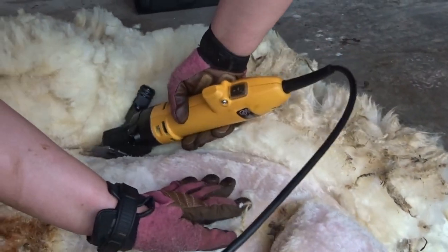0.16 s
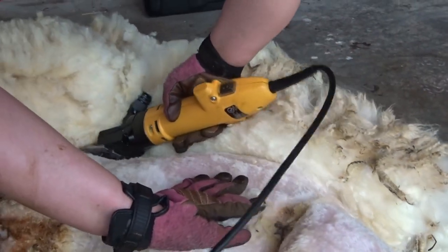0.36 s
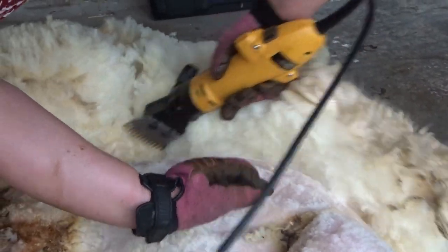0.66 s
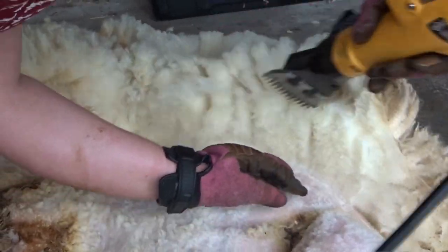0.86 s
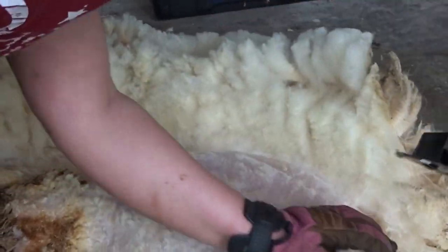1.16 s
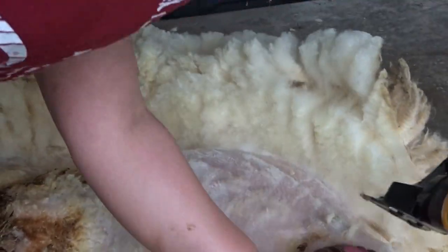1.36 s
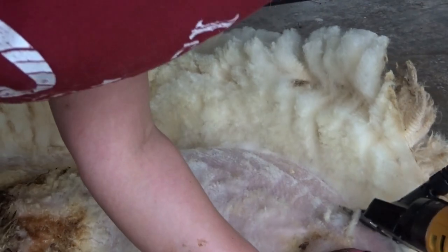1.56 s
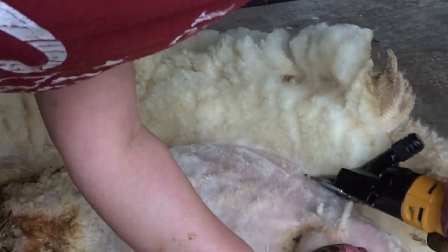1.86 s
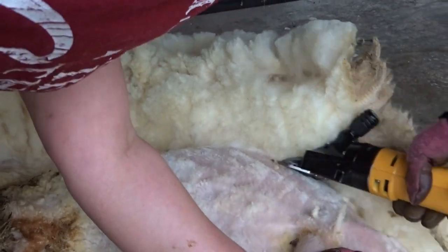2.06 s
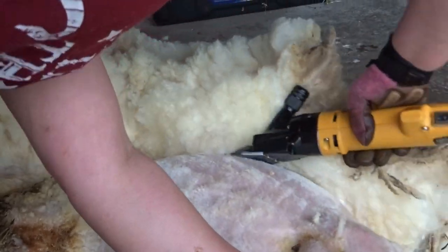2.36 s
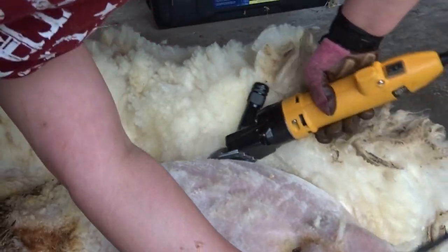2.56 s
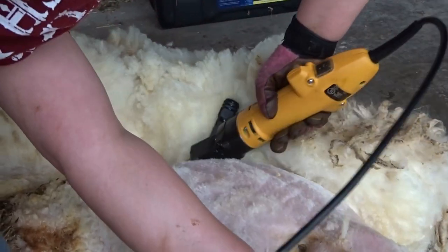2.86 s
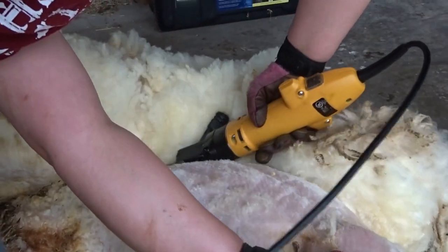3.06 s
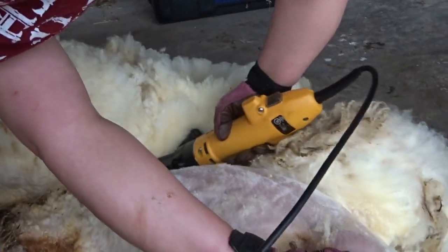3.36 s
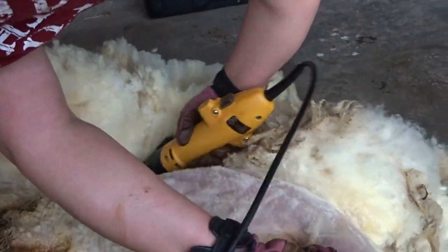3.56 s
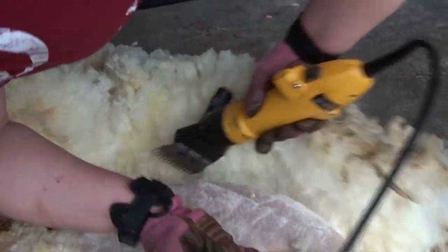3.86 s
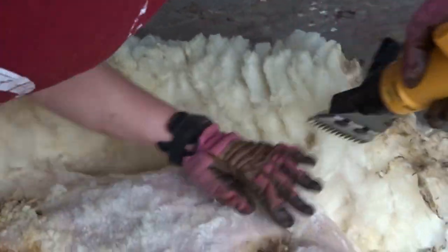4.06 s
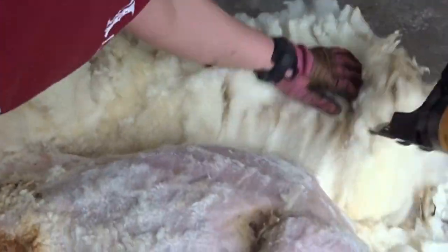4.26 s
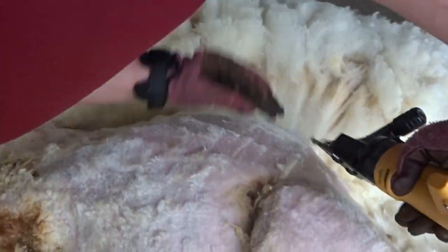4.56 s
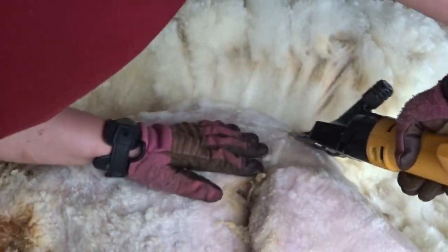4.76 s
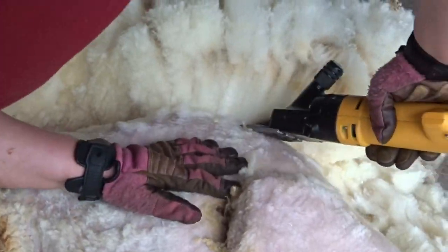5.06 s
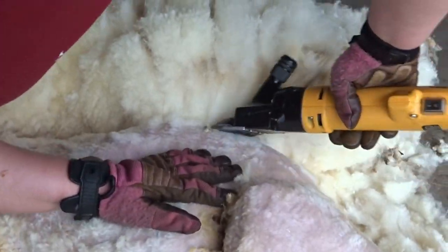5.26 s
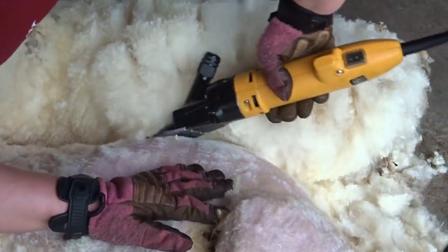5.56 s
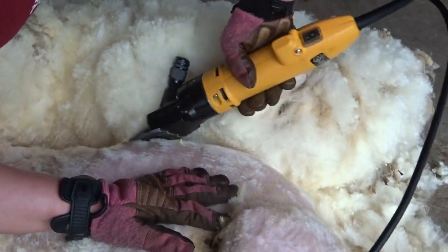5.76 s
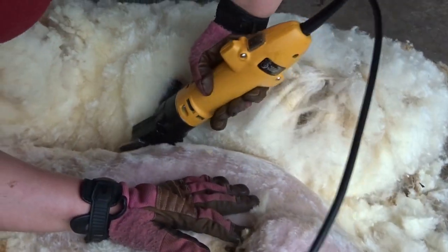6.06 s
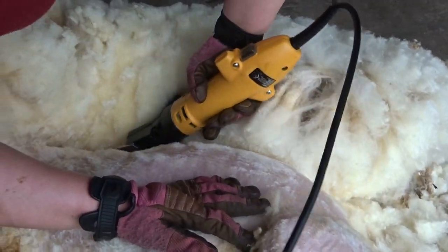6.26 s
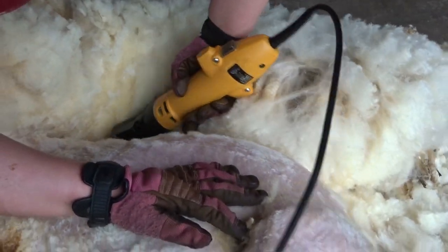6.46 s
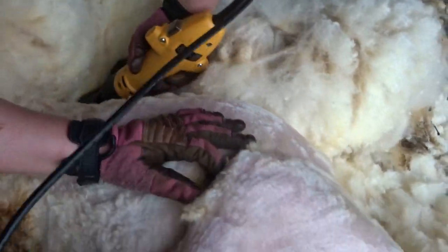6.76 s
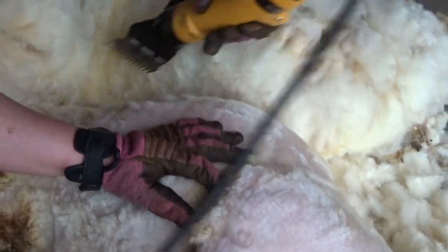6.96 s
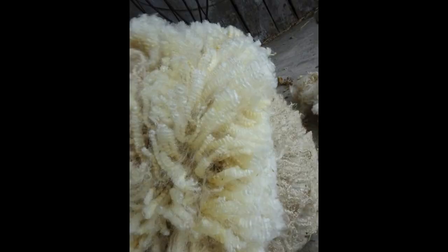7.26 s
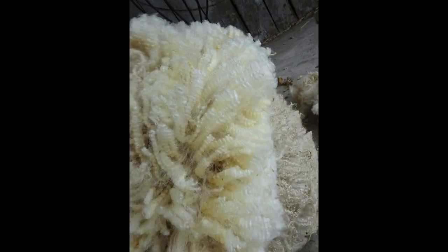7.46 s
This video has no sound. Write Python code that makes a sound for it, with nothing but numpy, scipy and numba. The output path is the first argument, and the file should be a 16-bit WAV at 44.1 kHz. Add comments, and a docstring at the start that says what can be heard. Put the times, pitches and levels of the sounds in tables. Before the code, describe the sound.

A hand-held shearing machine works through a fleece, close-miked, with faint barn reverberation. Steady hum, metallic grinding and fast blade chatter blend with a broad dry hiss and fine crackle. The high whine is slightly rough, rising when the tool is free and falling during long pushes, once quickly and then sliding lower, once more gradually and deeper. The hiss flares a little between pushes. The sound ends abruptly in silence.

```python
"""In a barn, electric sheep shears work close to a two-port microphone. At first a long push is under way;
it ends at 0.5 s and the motor picks up. Two more pushes, from 1.8 and 5 s, each slow it; at 7.2 s all is cut off.
A sine at the rotor's rate makes the hum, and a fluttering tone and weaker sines make the whine of the gears.
Clicks at each end of the cutter's stroke ring housing and comb; shaped noise grinds and rasps, and tiny clicks
crackle as wool fibres part. Dull echoes of the barn and a faint rumble lie behind."""
import sys
import numpy as np
from scipy import signal
from scipy.fft import rfft, irfft, next_fast_len
from scipy.io import wavfile
from scipy.ndimage import map_coordinates
from numba import njit

SR = 44100
rng = np.random.default_rng(int(sys.argv[2]) if len(sys.argv) > 2 else 0)


def log_audio(samples):
    """Write samples as a 16-bit WAV file to the path given in sys.argv[1]."""
    # one column per channel
    frames = np.atleast_2d(samples).T
    # limit to full scale, then quantise
    limited = np.clip(frames, -1, 1)
    pcm = np.round(limited * 32767).astype(np.int16)
    wavfile.write(sys.argv[1], SR, pcm)


N = 336483
TIME = np.arange(N) / SR  # s
WHINE_ORDER, ROTOR_ORDER = 32, 4  # cycles of whine and of hum per turn of the gear wheel
STROKES_PER_TURN = .5115  # cutter strokes, to and fro, per turn of the gear wheel
MAINS_HZ = 60


# Long pushes through the fleece; the first began before the start, the last comes after the end.
# Each row: comb enters in seconds, push ends in seconds, sag of the whine as the fleece bites in Hz,
# time to bite in seconds, further sag in Hz per second, gear grind change in dB, cutter knock change in dB.
BLOWS = [(-1.08, .5, 132, .12, 12, -7, 2), (1.82, 3.63, 77, .13, 82, 0.5, 1.8),
         (5, 6.73, 238, .78, 0, 1.5, -0.5), (8.5, 9.9, 238, .78, 0, 0, 1)]
FREE_HZ, RECOVER_S = 3178, .41  # gear whine with no load; time the motor takes to pick up again


def motor_speed():
    """Fleece bites, then may slow the motor further the longer the push lasts; it then recovers. Whine in Hz."""
    hz = FREE_HZ
    for enters, ends, bite_hz, bite_s, drag_hz_per_s, *_ in BLOWS:
        cutting_s = np.clip(TIME, enters, ends) - enters
        bite_sag_hz = bite_hz * (1 - np.exp(-cutting_s / bite_s))
        sag_hz = bite_sag_hz + drag_hz_per_s * cutting_s
        recovery = np.exp(-np.maximum(TIME - ends, 0) / RECOVER_S)
        hz = hz - sag_hz * recovery
    return hz


def by_blow(column, ease_s):
    """A column of BLOWS held through each push, easing in and out."""
    total = 0
    for row in BLOWS:
        eased_in = np.tanh((TIME - row[0]) / ease_s)
        eased_out = np.tanh((TIME - row[1]) / ease_s)
        total = total + row[column] * (eased_in - eased_out) / 2
    return total


def blow_cycle():
    """Where the hand is in its round: 0 as the comb enters, 0.5 as the push ends, 1 when it is back."""
    moments = np.array(BLOWS)[:, :2].ravel()
    return np.interp(TIME, moments, np.arange(len(moments)) / 2) % 1


# Stages of every blow, by name: the push runs from 0 to 0.5, the way back from 0.5 to 1.
# Each entry: middle in cycles, half width in cycles.
STAGES = dict(entering=(0.13, 0.068), buried=(0.32, 0.21), through=(.48, 0.06), clear=(0.573, 0.026),
          lifted=(0.643, .055), carried=(.77, 0.078), reaching=(0.92, .07))


def stage_weights():
    """How far each stage of the blow holds, 0 to 1."""
    cycle = blow_cycle()
    weights = {}
    for name, (middle, width) in STAGES.items():
        from_middle = (cycle - middle + .5) % 1 - .5
        weights[name] = bell(from_middle, width)
    return weights


def staged(rule, stages):
    """A usual value plus the change that each stage brings."""
    return sum(change * stages.get(name, 1) for name, change in rule.items())


# The whine drops out or swells briefly as the tool turns.
# Each row: middle in seconds, half width in seconds, change in dB.
WHINE_DIPS = [(.31, 0.05, -7), (.5, .09, -1.5), (.9, 0.056, -10), (1.62, .13, -2), (2.3, 0.06, -4.5),
              (2.48, .05, -1.5), (3.2, .04, -1), (3.59, 0.092, -10.5), (4.0, 0.049, -5), (4.22, 0.023, -13),
              (4.4, 0.027, -7), (4.5, .04, 2.5), (4.75, 0.1, -2), (5.22, 0.088, -3), (5.41, 0.054, -5.5),
              (5.6, 0.15, -5), (6.07, 0.1, 1.5), (6.67, 0.097, -8), (6.968, 0.14, -4.5)]
WHINE_DB = -40.5  # level of the whine between its dips and swells


def gear_whine(turns, load, sway):
    """Teeth mesh harder and softer in each turn of the slightly eccentric wheel, more so under load."""
    angle = 2 * np.pi * turns
    flutter = (.38 + .27 * load) * (1 + .2 * walk(5))
    rough = .09
    force = 1 + flutter * np.cos(angle) + rough * walk(260)
    phase_sway = sway * np.sin(angle + 1.3 * walk(4.3))
    whine = unit(force * np.sin(WHINE_ORDER * angle + phase_sway + rough * walk(200)))
    return whine * undb(WHINE_DB + brief_changes(WHINE_DIPS) + 0.71 * walk(12))


# Levels of the tones at twice and three times the whine.
# Each entry: the usual level in dB, or the change in dB at the named stage.
SECOND_DB = dict(usual=-56, entering=2, buried=-4, through=1, lifted=1, carried=-3, reaching=-3.5)
THIRD_DB = dict(usual=-65.5, entering=-1, buried=3, through=-8.5, lifted=-5, carried=-1, reaching=2)


def whine_harmonics(turns, stages):
    """Meshing teeth also sound at twice and three times the whine, stronger or weaker by stage."""
    second = overtone(turns, order=2 * WHINE_ORDER, rough=0.44)
    second = second * undb(staged(SECOND_DB, stages) + 2.3 * walk(11))
    third = overtone(turns, order=3 * WHINE_ORDER, rough=.25)
    third = third * undb(staged(THIRD_DB, stages) + 4 * walk(14))
    return second + third


# Weaker gear tones beside the whine. Each row: multiple of the gear wheel's turn, level in dB.
GEAR_TONES = [(7, -85.5), (8, -75.5), (9, -79.5), (16, -67.5), (20, -64), (23, -72.5), (24, -72.5),
              (27, -76), (28, -58), (29, -61), (35, -63.5), (36, -58), (37, -68), (39, -60.5), (40, -72.5),
              (44, -69.5), (52, -66), (53, -71.5), (68, -80), (76, -67.5), (128, -76)]


def gear_tones(turns, fading_db):
    """Uneven teeth add weaker tones; each swells and fades as the tool is turned in the hand."""
    total = 0
    for order, db in GEAR_TONES:
        tone = overtone(turns, order=round(order), rough=0.83)
        total = total + undb(db) * unit(tone * undb(fading_db * walk(6.6)))
    return total


def overtone(turns, order, rough):
    """One gear tone, its phase shaken (rough, in radians) by play in the teeth; rms 1."""
    return unit(np.sin(2 * np.pi * order * turns + rough * walk(25)))


def cutting_head(turns, stages):
    """The crank throws the cutter to and fro; its knocks excite body and blades, harder in some pushes."""
    strokes = STROKES_PER_TURN * turns
    knocks = cutter_knocks(strokes, back_db=-3.5, scatter_db=3.5, jitter_s=.00013)
    grind_db, knock_db = by_blow(5, ease_s=.06), by_blow(6, ease_s=.2)
    housing_and_comb = body(turns, knocks, stages, knock_db)
    return glance(housing_and_comb + blades(strokes, knocks, stages, grind_db, uneven_db=.7))


# Colours of the four blade sounds. Each row: frequency in Hz, relative level in dB.
GRIND_COLOUR = [(300, -40.5), (1800, -39), (2400, -8.5), (2750, -5), (3080, 2), (3500, 1), (3800, -2.5),
                (4500, -24.5)]
RASP_COLOUR = [(100, -42.5), (400, -46), (1500, -5.5), (2600, -16), (3400, -8), (4000, 2), (5000, 4.5),
               (5800, 0), (7500, -8.5), (10000, -18), (15500, -29)]
SNIP_COLOUR = [(200, -51), (2500, -40), (5000, -16), (6400, 3), (7500, 3.5), (8500, 0), (9500, 2.5),
               (11000, -1.5), (15500, -16.5)]
SIZZLE_COLOUR = [(500, -43), (7000, -29.5), (9500, -1.5), (11000, 1.5), (13500, 7), (15500, 1.5)]
# Their base levels. Each entry: the usual level in dB, or the change in dB at the named stage.
GRIND_DB = dict(usual=-51.5, entering=3, buried=4.5, through=-0.3, clear=3, lifted=2, carried=0.5, reaching=-.8)
RASP_DB = dict(usual=-46.5, entering=0.7, buried=-0.6, through=3.5, clear=1.5, lifted=1, carried=1.6, reaching=0.7)
SNIP_DB = dict(usual=-49, entering=2.2, buried=-1, through=2.2, clear=0.5, lifted=3, carried=0.3, reaching=2.3)
SIZZLE_DB = dict(usual=-52.5, entering=1.7, buried=-0.8, through=0.3, clear=1.3, lifted=0.3, carried=-2, reaching=0.8)
# Band that hand, fleece and floor favour. Each entry: the usual centre in Hz, or the shift in Hz at a stage.
RASP_HZ = dict(usual=4480, buried=-550, through=150, lifted=650, carried=-250)
SNIP_HZ = dict(usual=8700, through=-1600, lifted=-400, carried=-1200)
# The hiss of the blades flares or thins briefly.
# Each row: middle in seconds, half width in seconds, change in dB.
FLARES = [(.33, .08, 1.9), (.66, .08, -2.5), (.85, .06, 2.5), (1.03, .07, -1.1), (3.33, .1, -1.5),
          (4.13, .07, 1.5), (5.55, .15, 0.8), (6.97, .06, 1.5)]


def blades(strokes, knocks, stages, grind_db, uneven_db):
    """Gear teeth grind, blades rasp through wool, fibres part in clicks, the finest sizzle at the very top."""
    # the motor's torque pulses at twice the mains frequency, and the wool feeds in unevenly
    bite = swing(2 * MAINS_HZ * TIME, 0.065) * undb(0.85 * walk(190))

    once_a_turn = swing(strokes / STROKES_PER_TURN, 0.11)
    grind = colour(rng.standard_normal(N) * once_a_turn, GRIND_COLOUR) * undb(grind_db)

    friction = rng.standard_normal(N) * swing(2 * strokes, 0.055) * bite
    rasp = colour(friction + 0.49 * shifting_ring(knocks, t60=0.016, rate=3), RASP_COLOUR)
    rasp = emphasise(rasp, staged(RASP_HZ, stages), q=2.4, boost=0.44)

    snips = colour(fibre_snips(strokes, per_s=22000, spread_db=2.1, depth=0.11) * bite, SNIP_COLOUR)
    snips = emphasise(snips, staged(SNIP_HZ, stages), q=5.2, boost=0.42)
    sizzle = colour(fibre_snips(strokes, per_s=26000, spread_db=2.1, depth=.15) * bite, SIZZLE_COLOUR)

    flare = undb(brief_changes(FLARES))
    parts = [(grind, GRIND_DB), (rasp * flare, RASP_DB), (snips * flare, SNIP_DB), (sizzle * flare, SIZZLE_DB)]
    return sum(sound * undb(staged(rule, stages) + uneven_db * walk(9)) for sound, rule in parts)


def fibre_snips(strokes, per_s, spread_db, depth):
    """Tiny clicks of wool parting, louder where the cutter teeth cross the comb, twice a stroke."""
    cut = rng.random(N) < per_s / SR
    size = undb(spread_db * np.minimum(rng.exponential(size=N), 5))
    clicks = cut * size * rng.standard_normal(N)
    return clicks * swing(2 * strokes, depth) * swing(strokes, 0.042)


# Colours of housing and comb. Each row: frequency in Hz, relative level in dB.
HOUSING_COLOUR = [(150, -52.5), (280, -20.5), (450, -10), (590, -4.5), (660, 2.5), (760, -6.5), (870, -2),
                  (1000, -1), (1250, -6), (1900, -34)]
COMB_COLOUR = [(100, -36), (600, -20.5), (1000, -11.5), (1300, -1.5), (1600, -2), (2000, -2), (2450, 3.5),
               (2750, 1), (3300, -8.5), (4500, -35.5)]
# Their base levels. Each entry: the usual level in dB, or the change in dB at the named stage.
HOUSING_DB = dict(usual=-57, entering=1.8, buried=1, through=2, clear=0.5, lifted=-2.5, carried=-5, reaching=-2.5)
COMB_DB = dict(usual=-48, entering=0.4, buried=-2.5, through=1, clear=-2, lifted=1.3, carried=0.1, reaching=0.6)
# Band that hand, fleece and floor favour. Each entry: the usual centre in Hz, or the shift in Hz at a stage.
HOUSING_HZ = dict(usual=866, entering=-150, buried=-70.5, carried=190, reaching=130)
COMB_HZ = dict(usual=2180, through=-720, lifted=-400, carried=-500)


def body(turns, knocks, stages, knock_db):
    """The cutter's knocks and the rub of the bearings ring the housing and the steel comb."""
    rub = rng.standard_normal((2, N))
    housing = colour(shifting_ring(knocks, t60=.05, rate=2.018) + 1.09 * rub[0], HOUSING_COLOUR)
    housing = emphasise(housing, staged(HOUSING_HZ, stages), q=6.7, boost=0.74)
    comb_rub = 1.4 * rub[1] * swing(turns, 0.033)
    comb = colour(shifting_ring(knocks, t60=0.074, rate=2) + comb_rub, COMB_COLOUR)
    comb = emphasise(comb, staged(COMB_HZ, stages), q=13, boost=0.51)
    return housing * undb(staged(HOUSING_DB, stages) + knock_db) + comb * undb(staged(COMB_DB, stages))


def cutter_knocks(strokes, back_db, scatter_db, jitter_s):
    """The cutter slaps through its play at both ends of each stroke, softer on the way back."""
    ends = np.arange(1, int(2 * strokes[-1]))
    chance = np.clip(rng.standard_normal((1024, 2))[ends], -1.4, 1.4)
    at_s = np.interp(ends / 2, strokes, TIME) + jitter_s * chance[:, 0]
    size = undb(back_db * (ends % 2) + scatter_db * chance[:, 1])
    return np.bincount(np.clip(at_s * SR, 0, N - 1).astype(int), size, N)


def glance(x):
    """Sound glances off arm and hide; the path changes as the tool moves and sweeps the colour."""
    delay_s = .000694 * np.exp(.25 * walk(2.5))  # wanders by about a quarter
    reflection = np.interp(TIME - delay_s, TIME, x)
    return x + undb(-13) * reflection


# Rotor hum, more or less screened by hand and fleece.
# Each row: time in seconds, level in dB before a lift of 0.14 dB.
HUM_DB = [(0.0, -55.5), (0.06, -58.5), (0.92, -58), (0.98, -61.5), (1.73, -62), (1.87, -67.5),
          (2.55, -56.5), (3.3, -68), (3.62, -60), (3.66, -65.5), (3.94, -56.5), (4.12, -57.5), (4.7, -70),
          (5.14, -74.5), (5.32, -65), (5.63, -59.5), (6.21, -68), (7.15, -60.5)]


def rotor_hum(turns):
    """The spinning rotor hums at a fixed multiple of the gear wheel's turn, slightly unsteady in level."""
    hum = unit(np.sin(2 * np.pi * ROTOR_ORDER * turns) * undb(1.1 * walk(45)))
    return hum * undb(np.interp(TIME, *np.transpose(HUM_DB)) + 0.14)


# Rumble of the barn. Each row: frequency in Hz, relative level in dB.
BARN_COLOUR = [(20, 4), (60, -14), (150, -5), (250, 4.5), (500, 28), (2000, -14.5)]


def barn(direct, wet_db, t60):
    """Floor and walls answer dully and differently at each side; a faint rumble lies underneath."""
    dull = signal.sosfilt(signal.butter(1, [330, 9000], "bandpass", fs=SR, output="sos"), direct.mean(axis=0))
    dull = signal.sosfilt(signal.butter(2, 10500, fs=SR, output="sos"), dull)
    echo = np.array([ring(dull, t60), ring(dull, t60)])
    rumble = undb(-80) * colour(rng.standard_normal(N), BARN_COLOUR)
    return direct + undb(wet_db) * echo + rumble


def undb(db):
    """Decibels to gain."""
    return 10 ** (np.asarray(db) / 20)


def unit(x):
    """Scale to rms 1."""
    return x / np.sqrt(np.mean(x ** 2))


def bell(x, width):
    """A smooth swell, 1 where x is 0 and 1/e at width."""
    return np.exp(-(x / width) ** 2)


def brief_changes(table):
    """Sum rows of middle, half width and change in dB into one level curve."""
    return sum(db * bell(TIME - s, width) for s, width, db in table)


def walk(rate):
    """Smooth chance with a spread of about 1 that changes about rate times a second."""
    steps = rng.standard_normal(2048)
    coarse = TIME[::64]
    return np.interp(TIME, coarse, map_coordinates(steps, [coarse * rate], order=3, mode="wrap"))


def swing(turns, depth):
    """A gain that rises and falls once a turn; rms 1."""
    return unit(np.exp(depth * np.cos(2 * np.pi * turns)))


def across(points, freqs):
    """Read (Hz, value) points on a log-frequency axis."""
    hz, value = np.transpose(points)
    return np.interp(np.log(freqs + 1), np.log(hz), value)


def colour(x, points):
    """Filter x by (Hz, dB) points; rms 1."""
    size = next_fast_len(N, True)
    gain = undb(across(points, np.fft.rfftfreq(size, 1 / SR)))
    return unit(irfft(rfft(x, size) * gain, size)[:N])


def ring(x, t60):
    """Let x ring in a dense cloud of modes that fall by 60 dB in t60 seconds."""
    t = TIME[:SR // 2]
    tail = rng.standard_normal(len(t)) * np.exp(-np.log(1000) * t / t60)
    return signal.fftconvolve(x, tail / np.linalg.norm(tail))[:N]


def shifting_ring(x, t60, rate):
    """The same ringing body heard from a changing angle: its modes trade strength."""
    angle = 1.47 * walk(rate)
    return unit(np.cos(angle) * ring(x, t60) + np.sin(angle) * ring(x, t60))


@njit
def resonance(x, hz, q):
    """State-variable band-pass with a moving centre, gain 1 there."""
    out, band, low = np.empty(len(x)), 0., 0.
    for i in range(len(x)):
        g = np.tan(np.pi * hz[i] / SR)
        v = (band + g * (x[i] - low)) / (1 + g * (g + 1 / q))
        band = 2 * v - band
        low = low + 2 * g * v
        out[i] = v / q
    return out


def emphasise(x, hz, q, boost):
    """Hand, fleece and floor favour a band that shifts as the tool moves; rms 1."""
    return unit(x + boost * resonance(x, hz, float(q)))


# Whine at the left port against the right.
# Each entry: the usual left minus right in dB, or the change in dB at the named stage.
WHINE_PAN_DB = dict(usual=-2, buried=0.5, lifted=0.8, reaching=-2)


def scene():
    """One motor speed drives rotor, gears and cutter; the round of the hand shades most of them."""
    whine_hz, stages = motor_speed(), stage_weights()
    turns = np.cumsum(whine_hz / WHINE_ORDER * (1 + .0004 * walk(40))) / SR
    # 0 when the motor is fastest, 1 when the fleece slows it most
    load = (whine_hz.max() - whine_hz) / np.ptp(whine_hz)
    whine = gear_whine(turns, load, sway=0.098)
    gears = whine_harmonics(turns, stages) + gear_tones(turns, fading_db=3.2)
    machine = gears + cutting_head(turns, stages) + rotor_hum(turns)
    sides = np.array([[.5], [-.5]])  # left, right
    pan_db = staged(WHINE_PAN_DB, stages) + 0.88 * walk(8.6)
    direct = whine * undb(sides * pan_db) + machine * undb(sides * -.5)
    return barn(direct, wet_db=-13.0, t60=0.38)


# Left port of the microphone against the right. Each row: frequency in Hz, phase lead in radians.
PORT_LEAD = [(100, 0.18), (450, 0.36), (950, 0.48), (2000, 0.29), (4500, 0.23), (8000, 0), (13000, 0)]
STOP_S, TOP_HZ = 7.2, 15600  # silence from here on; upper limit of the microphone's band


def record(dry):
    """Two close ports, the left one reached slightly earlier; the sound stops dead; the top is cut."""
    size = next_fast_len(N, True)
    lead = across(PORT_LEAD, np.fft.rfftfreq(size, 1 / SR))
    phase_shift = np.exp(.5j * np.array([lead, -lead]))
    ports = irfft(rfft(dry, size) * phase_shift, size)[:, :N]
    fade_in = np.minimum(TIME / .008, 1)
    running = np.clip((STOP_S - TIME) / 0.027, 0, 1) ** 3.3
    top_cut = signal.ellip(10, .1, 80, TOP_HZ, fs=SR, output="sos")
    return signal.sosfilt(top_cut, ports * running * fade_in)


dry = scene()
out = record(dry)
log_audio(out)
```